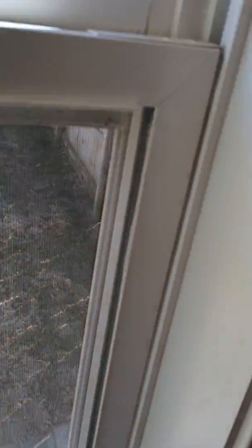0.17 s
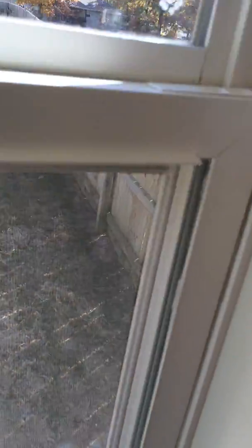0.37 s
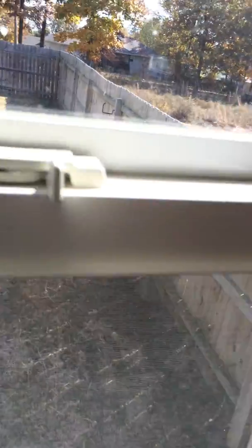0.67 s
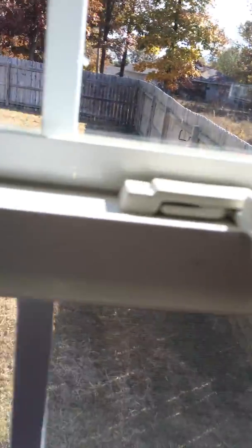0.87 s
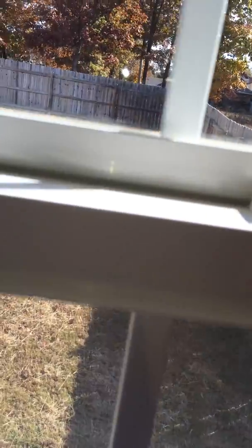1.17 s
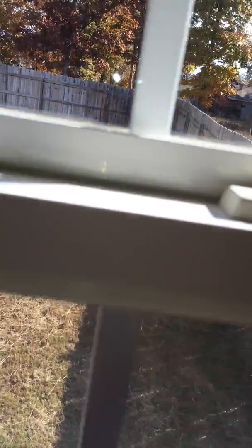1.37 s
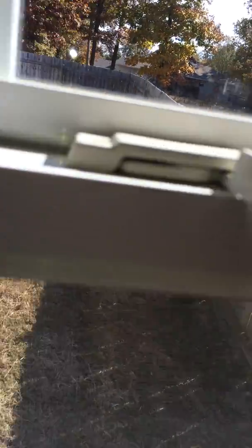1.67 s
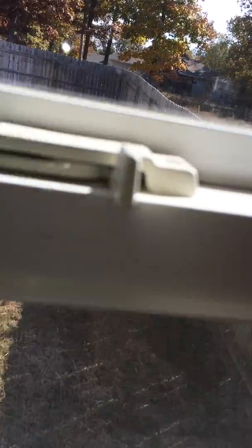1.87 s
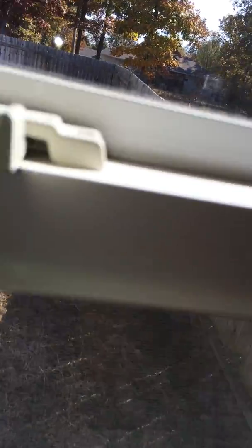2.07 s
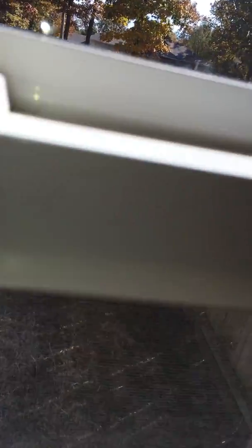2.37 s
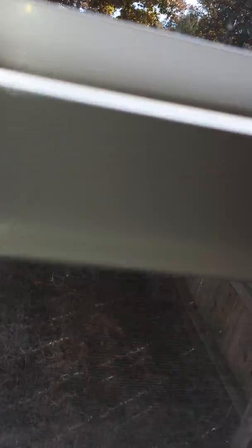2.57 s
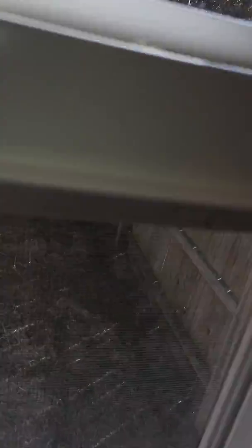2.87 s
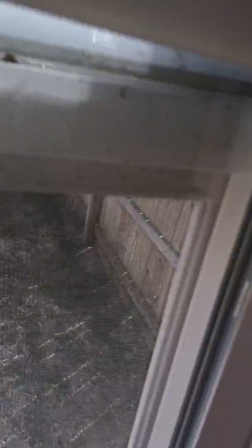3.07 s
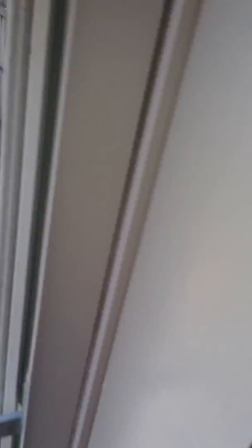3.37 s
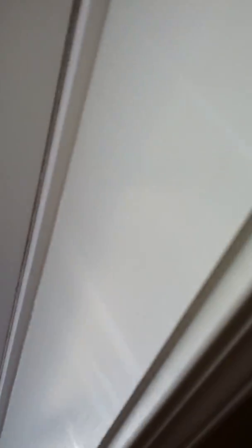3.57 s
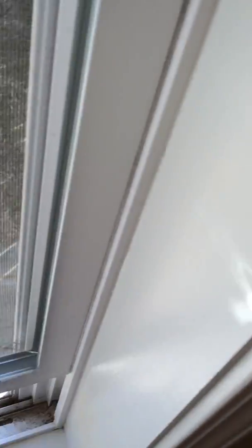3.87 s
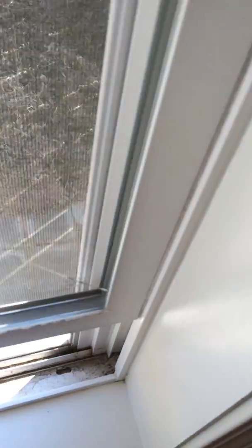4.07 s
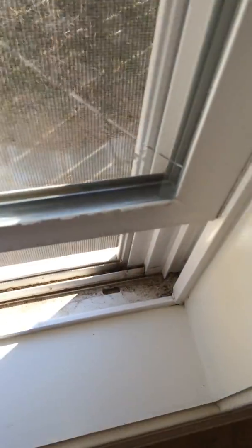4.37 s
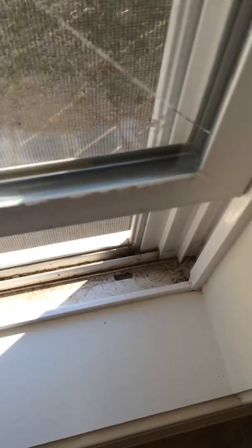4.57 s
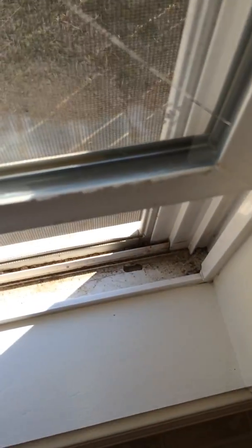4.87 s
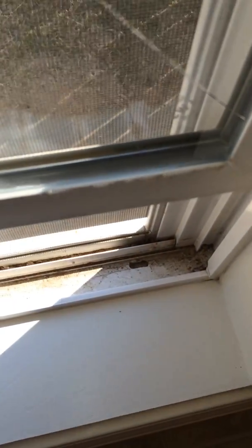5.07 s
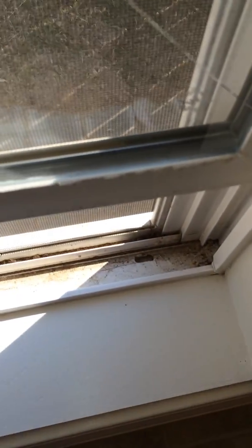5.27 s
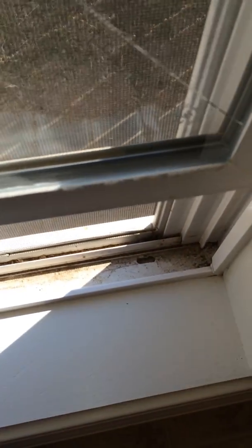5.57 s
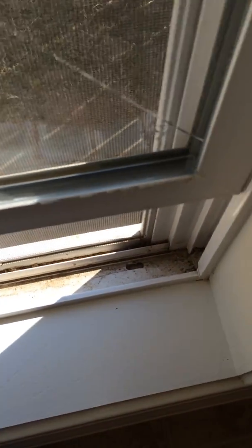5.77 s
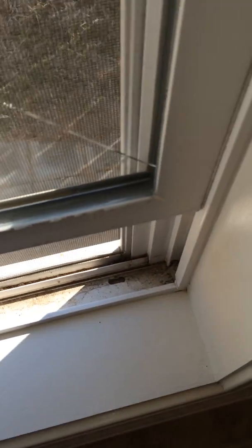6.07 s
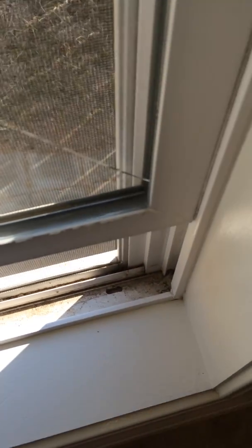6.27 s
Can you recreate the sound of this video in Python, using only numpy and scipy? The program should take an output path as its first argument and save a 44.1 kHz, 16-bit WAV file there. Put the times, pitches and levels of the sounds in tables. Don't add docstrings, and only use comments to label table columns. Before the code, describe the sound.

A quiet room, heard close on one microphone: soft air noise, two low appliance hums beating against each other, and a very faint wavering whine throughout. Faint finger ticks and brushes at 0.55-0.7 s, with a tiny click. At 1.47 s a dry plastic click; at 1.9-1.97 s a tight cluster of hard, hollow clacks with a short low rumble. Light fumbling ticks at 2.2-2.57 s, then a sharp springy latch clack at 2.66 s. At 2.92-3.03 s a rapid rattling burst peaks at 2.95 s with the loudest, brightest crack, rumbling as the sash breaks loose. It slides with a brushy, gritty hiss, strongest until about 3.2 s, bumps dully at 3.6 s and stops at 3.8 s. Then near quiet: faint touches at 4.25 s, small ticks and soft bumps at 5.6-5.7, 5.95 and 6.2 s, and a last tap at 6.4 s.

```python
import sys
import numpy as np
from scipy import signal
from scipy.fft import rfft, irfft
from scipy.io import wavfile
from scipy.ndimage import uniform_filter1d

SR = 44100
rng = np.random.default_rng(int(sys.argv[2]) if len(sys.argv) > 2 else 0)


def wrap_up_sound(samples):
    columns = np.atleast_2d(samples).T
    tamed = np.clip(columns, -1, 1)
    steps = np.round(tamed * 32767).astype(np.int16)
    wavfile.write(sys.argv[1], SR, steps)


def field_ratio(decibels):
    return 10 ** (np.asarray(decibels, dtype=float) / 20)


N = 282681

# (frequency [Hz], density [dB per Hz])
AIR_SPECTRUM = [(15, -32), (25, 4), (60, 4.5), (100, -20), (300, -10.5), (720, -21.5), (950, -38.5),
                (1450, -16.5), (2360, -32.5), (5400, -27), (7500, -45), (12000, -54.5), (16000, -61)]
AIR_DB = -68

# (frequency [Hz], decay t60 [s])
ROOM_T60 = [(150, 0.96), (600, 0.19), (1500, 0.32), (4000, 0.11), (10000, 0.019)]
ROOM_DB = -38

# (frequency [Hz], first crest [s])
MOTORS = [
    (49.03, .0104),
    (59.12, .0036),
]
# (time [s], slower motor [dB], faster motor [dB])
MOTOR_LEVELS = [(0, -73, -63), (2.001, -60.5, -68.5), (4.002, -65, -68), (5, -69, -69), (6.41, -61, -65)]
# (frequency [Hz], rms level [dB], line width [Hz])
OVERTONES = [(195.4, -71.5, 4), (299.7, -71, 4.5), (348, -72.5, 0.83), (374.5, -77, 2.9), (463, -78, 3.6),
             (660, -91, 2.3), (5000, -91, 14.72), (5350, -99, 15), (12300, -103, 4)]
WHINE_ORDERS = [22, 25, 26, 28, 29, 31, 32.03]
WHINE_BASE_HZ, WHINE_REST_DB = 59.14, -91
# (order [1], centre [s], half length [s], level [dB])
SWELLS = [(32.03, .25, .4, -75), (32.03, 1.75, .75, -79), (32.03, 3.7, .35, -76), (32.03, 6.35, .4, -79),
          (31, .6, .5, -82), (29, 5, 1.2, -84), (26, 4.5, .3, -83), (28, 4.5, .8, -84), (25, .75, .4, -80),
          (25, 2.5, .9, -81), (25, 4.4, .65, -76), (25, 6.2, .6, -78), (22, .05, .4, -80),
          (22, 2.2, 1.1, -80), (22, 5.95, .7, -80.5)]

# (time [s], rumble [dB], decay t60 [s], boom over rumble [dB], scrape over rumble [dB])
JOLTS = [(1.89, -37.5, 0.25, -15, -15), (1.95, -56, 0.93, 2, -4), (2.402, -52.5, 0.87, -5, -13.5),
         (2.668, -45.5, 1.36, -6, -11.5), (2.959, -35.5, 0.69, -6.5, -2.5), (3.6, -72, 1.3, 15, 1),
         (5.469, -63.5, 1.2, 0, -19.5), (5.65, -66.5, 0.5, 13.5, -19.5), (6.21, -61, .6, 2.5, -4.5),
         (6.3, -64.5, .6, 6, -9)]
JOLT_RISE_S = 0.04143
SHUT_RUMBLE_DB, OPEN_RUMBLE_DB = -68.5, -62.5
SHUT_BOOM_DB, OPEN_BOOM_DB = -62.5, -59

# (time [s], speed as seal hiss [dB], seal squeeze that brightens it [dB])
SLIDE = [
    (2.96, -78, -7),
    (3.02, -47.5, -4),
    (3.12, -47, 1.7),
    (3.3, -52, 2.5),
    (3.4, -53, 0.5),
    (3.6, -52, 1.4),
    (3.76, -54.5, 3.5),
    (3.8, -62.5, -5),
    (3.84, -93, 3),
]
SLIDE_SCRAPE_DB = -2
# (time [s], hold [s], level [dB], brightness [dB])
STROKES = [(0.01, 0.069, -75.5, -5), (0.565, .1, -75, -5), (.67, 0.076, -72, -3), (1.481, 0.011, -63, -0.5),
           (1.54, 0.14, -69.5, -3.5), (1.753, 0.056, -72, 2.5), (1.901, 0.092, -60, -8),
           (2.21, 0.01, -72, -6), (2.452, 0.07, -70.5, -4), (2.57, 0.17, -67.5, -7.5),
           (2.893, .03, -71, -7), (3.82, 0.15, -77.5, -6), (4.26, .03, -77, -4), (5.429, 0.044, -75.5, -3),
           (5.615, 0.036, -67.5, 0), (5.72, .02, -77, -13), (5.966, .05, -74.5, -0.5),
           (6.04, .04, -72.5, 7), (6.211, 0.025, -72.5, -4), (6.308, .1, -79, -3)]
STROKE_ATTACK_S, STROKE_T60_S = 0.022, 0.46
REST_HISS_DB, REST_SCRAPE_DB, REST_SIZZLE_DB = -79, -77.5, -80.5
# (frequency [Hz], width [Hz], centre [s], half length [s], level [dB])
TRACK_SONG = [(2560, 200, 3.1, .06, -57), (4450, 250, 3.1, 0.053, -61), (7600, 900, 3.17, .12, -51.5)]

# (frequency [Hz], width [Hz], level [dB], decay t60 [s])
LATCH_MODES = [(1288, 167, 0, 0.15), (1600, 550, -1, .25), (3310, 40, 9.5, 0.048), (3350, 800, -10, 0.54),
               (4800, 860, -16, 0.28), (5400, 300, -11, 0.11), (6407, 250, -18, 0.41)]
# (time [s], peak level [dB])
LATCH_STRIKES = [(2.657, -37.5), (2.669, -45.5), (2.918, -49), (2.927, -56), (2.949, -42.5)]

# (frequency [Hz], level [dB], decay t60 [s])
FRAME_MODES = [(200, -7, .06), (293, 2, .08), (370, -1, .06), (468, 0, .06), (570, 0, .04), (720, 4, .03),
               (950, 1, .022), (1180, 0, .02), (1315, 2, .025), (1570, 0, .02), (1720, -1, .016),
               (1920, 1, .018), (2250, 0, .014), (2500, -5, .01), (2800, -1, .012), (3050, -3, .01),
               (3310, 4, .017), (3700, 3, .011), (4000, 0, .009), (4300, -4, .009), (4750, 4, .011),
               (5050, 3, .011), (5400, -4, .008), (5800, -6, .008), (6300, -3, .009), (6710, 1, .014)]
THUD_TILT_DB = 1.7
# (time [s], peak level [dB], favoured frequency [Hz], contact [s], crack [dB])
CLACKS = [(.666, -43, 3300, 0.00093, 3.5), (1.471, -31.5, 3570, 0.0008, -8),
          (1.473, -39.5, 4200, 0.0028, -6), (1.898, -39, 5400, 0.0012, -3),
          (1.9106, -32.5, 1500, 0.0018, 1), (1.916, -24.5, 4300, 0.0033, -5.5),
          (1.9254, -18, 1600, 0.0019, -22), (1.936, -32, 1410, 0.0068, -14),
          (1.959, -17, 4800, 0.00049, -1), (1.9646, -30, 1830, 0.0018, -15),
          (2.4506, -34, 1830, 0.0027, -17.5), (2.654, -20, 3430, 0.0014, -56),
          (2.667, -16, 4800, .001, -16), (2.6714, -24.5, 3300, .002, -14), (2.917, -30, 2170, 0.0028, -19),
          (2.927, -29.5, 1920, .0033, -21), (2.9472, -16, 2634, .0007, -9),
          (2.949, -4.5, 3950, .0005, -11.5), (2.952, -11, 4700, .001, -11.5),
          (2.955, -19.5, 3420, 0.00085, -14.5), (2.98, -12, 5000, .0027, -11.5),
          (2.997, -22, 3000, 0.0017, -13), (3.007, -28, 2850, 0.001, -24), (3.033, -24, 2640, 0.00078, -10)]
CLACK_THUD_DB, THUD_PER_DB = -12.5, -0.63
# (time [s], peak level [dB], favoured frequency [Hz], thud [dB])
TICKS = [(.551, -54, 2090, -13), (.578, -56, 2470, -14), (0.673, -65, 2670, -3), (.683, -58, 2370, -9),
         (1.54, -42, 990, -6), (1.541, -47, 2780, -16), (1.899, -41, 1500, -12), (1.913, -27.5, 920, -2),
         (2.216, -40, 2600, -5.5), (2.224, -46, 2560, -20), (2.431, -50, 1480, -3), (2.437, -53, 1460, -4),
         (2.443, -48, 1650, 0), (2.493, -53, 2050, 2), (2.504, -44, 6300, -6), (2.565, -58.5, 3180, -9),
         (4.28, -54, 1680, -1), (5.61, -38, 2300, -21), (5.616, -44, 5000, -14), (5.719, -42, 2250, -4.5),
         (5.725, -46.5, 1800, 3), (5.985, -57, 2670, 0.5), (6.207, -44, 4060, -11), (6.219, -42, 1780, 3),
         (6.249, -47, 2250, -7), (6.379, -50, 2600, -11), (6.404, -34.5, 1100, -0.5)]
TICK_CONTACT_S, TICK_CRACK_DB = 0.00081, -10
# (time [s], peak level [dB], favoured frequency [Hz], thud [dB])
BUMPS = [(3.581, -30.5, 2200, -1.5), (3.587, -43, 990, 10), (3.623, -45, 2000, 3.5), (3.808, -46, 960, 7.5),
         (4.243, -59.5, 1210, 11.5), (5.6102, -38, 804, -6), (5.939, -58, 5310, -5),
         (6.208, -38.5, 940, -6)]
BUMP_CONTACT_S, BUMP_CRACK_DB = 0.0013, -18


def in_time(rows):
    s, *columns = np.transpose(rows)
    return [np.interp(np.arange(N) / SR, s, column) for column in columns]


def at_hz(points, hz):
    table_hz, values = np.transpose(points)
    return np.interp(np.log(hz), np.log(table_hz), values)


def after(s):
    return np.maximum(np.arange(N) / SR - s, 0)


def power_db(power):
    return 10 * np.log10(power + 1e-20)


def rms_one(x):
    return x / np.sqrt(np.mean(x ** 2) + 1e-20)


def band(x, low_hz, high_hz, order=2):
    edges_hz = [low_hz, min(high_hz, .45 * SR)]
    return signal.sosfilt(signal.butter(order, edges_hz, "band", fs=SR, output="sos"), x)


def drift(rate_hz):
    pole = np.exp(-80 * np.pi * rate_hz / SR)
    noise = rng.standard_normal(N // 40 + 2002)
    slow = signal.lfilter([1], [1, -2 * pole, pole * pole], noise)[2000:]
    return np.interp(np.arange(N) / 40, np.arange(len(slow)), rms_one(slow))


def air():
    hz = np.maximum(np.fft.rfftfreq(N, 1 / SR), 1)
    spectrum = rfft(rng.standard_normal(N)) * field_ratio(at_hz(AIR_SPECTRUM, hz))
    return field_ratio(AIR_DB) * rms_one(irfft(spectrum, N))


def room(x):
    t = np.arange(SR // 2) / SR
    edges = 90 * 2 ** np.arange(0, 7.6, .5)
    tail = 0
    for low, high in zip(edges, edges[1:]):
        fall = field_ratio(-60 * t / at_hz(ROOM_T60, np.sqrt(low * high)))
        tail = tail + band(rng.standard_normal(len(t)), low, high) * fall
    tail = tail * (1 - np.exp(-(t / 0.021) ** 2))
    return field_ratio(ROOM_DB) * signal.fftconvolve(x, tail)[:N]


def whine_db(order):
    t = np.arange(N) / SR
    power = field_ratio(WHINE_REST_DB) ** 2
    for swell_order, s, half_s, db in SWELLS:
        if abs(swell_order - order) < .5:
            power = power + field_ratio(db) ** 2 * np.exp(-2 * ((t - s) / half_s) ** 4)
    return power_db(power)


def motors():
    t, out = np.arange(N) / SR, np.zeros(N)
    for (hz, crest_s), db in zip(MOTORS, in_time(MOTOR_LEVELS)):
        out += field_ratio(db + 5.5) * np.cos(2 * np.pi * hz * (t - crest_s))
    for order in WHINE_ORDERS:
        level = field_ratio(whine_db(order) + 3 + 1.2 * drift(14))
        out += level * np.sin(2 * np.pi * order * WHINE_BASE_HZ * t + 0.7 * drift(7))
    for hz, db, width_hz in OVERTONES:
        level = field_ratio(db + 3 + 2.5 * drift(3))
        cycles = hz * t + np.cumsum(width_hz * drift(6)) / SR
        out += level * np.sin(2 * np.pi * cycles)
    return out


def jolts():
    power = np.zeros((3, N))
    for s, db, t60, boom_db, scrape_db in JOLTS:
        rise = np.minimum(after(s) / JOLT_RISE_S, 1)
        swell = rise * field_ratio(db - 60 * after(s + JOLT_RISE_S) / t60)
        power += (field_ratio(np.array([[0], [boom_db], [scrape_db]])) * swell) ** 2
    return power


def rumble_levels():
    travel = np.clip(after(SLIDE[0][0]) / (SLIDE[-1][0] - SLIDE[0][0]), 0, 1)
    gap_rumble_db = SHUT_RUMBLE_DB + travel * (OPEN_RUMBLE_DB - SHUT_RUMBLE_DB)
    gap_boom_db = SHUT_BOOM_DB + travel * (OPEN_BOOM_DB - SHUT_BOOM_DB)
    jolt_rumble, jolt_boom, _ = jolts()
    return power_db(jolt_rumble + field_ratio(gap_rumble_db) ** 2), power_db(jolt_boom + field_ratio(gap_boom_db) ** 2)


def rumble():
    rumble_db, boom_db = rumble_levels()
    low = rms_one(band(rng.standard_normal(N), 230, 850)) * field_ratio(rumble_db - 4 + 1.5 * drift(9.4))
    boom = rms_one(band(rng.standard_normal(N), 69, 240)) * field_ratio(boom_db + 1.5 + 0.62 * drift(1))
    return low + boom


def rub_levels():
    speed_db, squeeze_db = in_time(SLIDE)
    slide_db = [speed_db, speed_db + SLIDE_SCRAPE_DB - squeeze_db / 2, speed_db + squeeze_db]
    power = field_ratio(np.array(slide_db)) ** 2
    power *= (after(SLIDE[0][0]) > 0) & (after(SLIDE[-1][0]) == 0)
    power += field_ratio(np.array([[REST_HISS_DB], [REST_SCRAPE_DB], [REST_SIZZLE_DB]])) ** 2
    for s, hold_s, db, bright_db in STROKES:
        attack = np.minimum(after(s - STROKE_ATTACK_S) / STROKE_ATTACK_S, 1)
        shape = attack * field_ratio(db - 60 * after(s + hold_s) / STROKE_T60_S)
        power += (field_ratio(np.array([[0], [-bright_db / 2], [bright_db]])) * shape) ** 2
    power[1] += jolts()[2]
    return power_db(power)


def rub():
    hiss_db, scrape_db, sizzle_db = rub_levels()
    unevenness_db = 1.5 * np.minimum(rng.exponential(1, (3, N)), 5)
    grains = rng.standard_normal((3, N)) * field_ratio(unevenness_db)
    groove = band(grains[0], 4600, 6600, order=1)
    hiss = rms_one(band(grains[0], 3600, 9000) + groove) * field_ratio(hiss_db + drift(25))
    scrape = rms_one(band(grains[1], 530, 3600)) * field_ratio(scrape_db + 0.5 * drift(23))
    sizzle = rms_one(band(grains[2], 8000, 19000)) * field_ratio(sizzle_db + drift(25))
    t, song = np.arange(N) / SR, np.zeros(N)
    for hz, width_hz, s, half_s, db in TRACK_SONG:
        tone = rms_one(band(grains[1], hz - width_hz / 2, hz + width_hz / 2))
        song += tone * field_ratio(db) * np.exp(-((t - s) / half_s) ** 2)
    return hiss + scrape + sizzle + song


def latch():
    out, t = np.zeros(N), np.arange(SR // 3) / SR
    for s, level_db in LATCH_STRIKES:
        noise, buzz = rng.standard_normal(len(t)), 0
        for hz, width_hz, db, t60 in LATCH_MODES:
            resonance = rms_one(band(noise, hz - width_hz / 2, hz + width_hz / 2))
            buzz = buzz + resonance * field_ratio(db - 60 * t / t60)
        i = round(s * SR)
        out[i:i + len(t)] += field_ratio(level_db) * buzz * np.minimum(t / .001, 1)
    return out


def all_knocks():
    rows = []
    for s, db, hz, contact_s, crack_db in CLACKS:
        thud_db = CLACK_THUD_DB + THUD_PER_DB * (db + 31)
        rows.append((s, db, hz, contact_s, thud_db, crack_db))
    for s, db, hz, thud_db in TICKS:
        rows.append((s, db, hz, TICK_CONTACT_S, thud_db, TICK_CRACK_DB))
    for s, db, hz, thud_db in BUMPS:
        rows.append((s, db, hz, BUMP_CONTACT_S, thud_db, BUMP_CRACK_DB))
    return rows


def knocks():
    size = 4096
    out, t = np.zeros(N + size), np.arange(size) / SR
    hz, mode_db, t60 = np.transpose(FRAME_MODES)
    decay = field_ratio(mode_db[:, None] - 60 * t / t60[:, None])
    rings = np.sin(2 * np.pi * hz[:, None] * t) * decay
    fade = np.minimum((t[-1] - t) / .03, 1) ** 2
    for s, peak_db, pitch_hz, contact_s, thud_db, crack_db in all_knocks():
        stage = t / max(contact_s, .0003)
        contact = rng.standard_normal(size) * stage * np.exp(-stage)
        tones = rfft(contact)
        contact = irfft(tones / np.sqrt(uniform_filter1d(abs(tones) ** 2, size=60)))
        chance = rng.standard_normal(len(hz))

        body_share = field_ratio(-19 * np.abs(np.log2(hz / pitch_hz)) + 1.2 * chance) * (hz > 700)
        body = band(signal.fftconvolve(contact, body_share @ rings)[:size], 600, 8000)
        thud_share = field_ratio(2.0 * chance - THUD_TILT_DB * np.log2(800 / hz)) * (hz <= 700)
        thud = signal.fftconvolve(contact, thud_share @ rings)[:size]
        snap = band(contact, pitch_hz * .45, pitch_hz * 1.6)
        top_hz = np.clip(15800 + 450 * crack_db, 9500, 15800)
        crack = band(contact, 7000, top_hz)

        hit = body / abs(body).max() + field_ratio(-12) * snap / abs(snap).max()
        hit = hit / abs(hit).max()
        hit = hit + field_ratio(thud_db) * thud / abs(thud).max() + field_ratio(crack_db) * crack / abs(crack).max()
        i = round(s * SR)
        out[i:i + size] += field_ratio(peak_db) * hit * fade
    return out[:N]


def scene():
    hits = knocks() + latch()
    steady = air() + room(hits) + motors() + rumble() + rub()
    steady = signal.sosfilt(signal.cheby2(14, 50, 15700, fs=SR, output="sos"), steady)
    mono = hits + steady
    return np.array([mono, mono])


def roll_off(x):
    return signal.sosfilt(signal.butter(12, 16450, fs=SR, output="sos"), x)


def record(dry):
    x = signal.sosfilt(signal.butter(3, 38, "high", fs=SR, output="sos"), dry)
    x = signal.sosfilt(signal.cheby2(10, 45, 16400, fs=SR, output="sos"), x)
    return roll_off(x)


dry = scene()
out = record(dry)
wrap_up_sound(out)
```